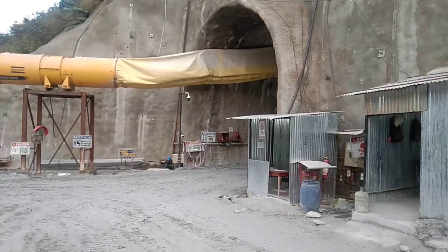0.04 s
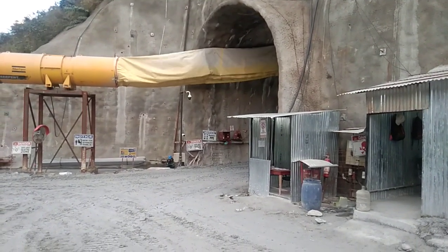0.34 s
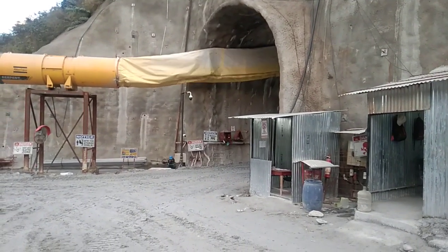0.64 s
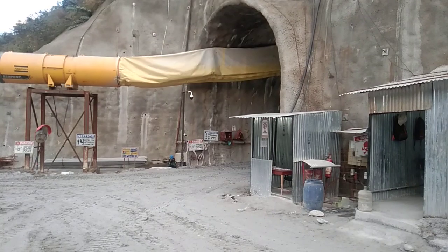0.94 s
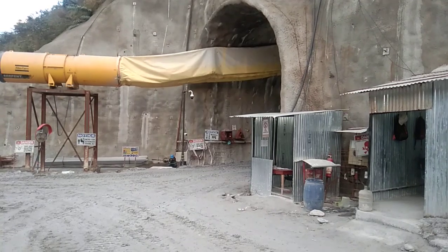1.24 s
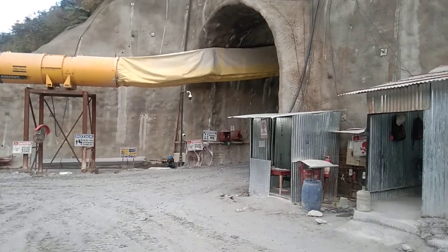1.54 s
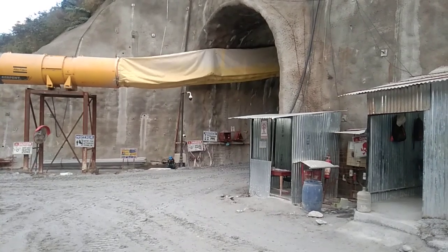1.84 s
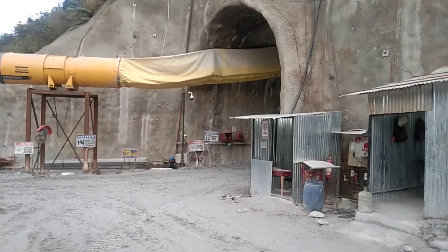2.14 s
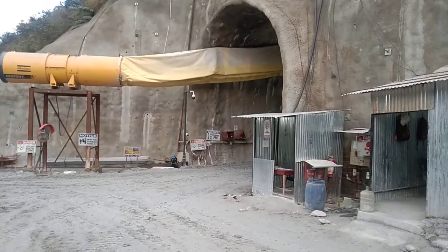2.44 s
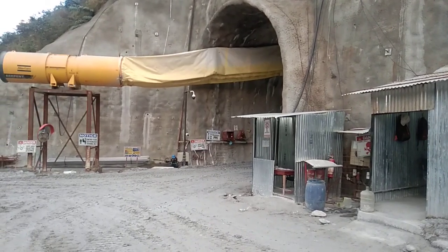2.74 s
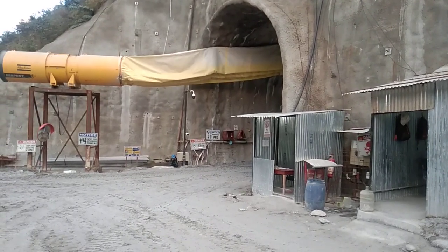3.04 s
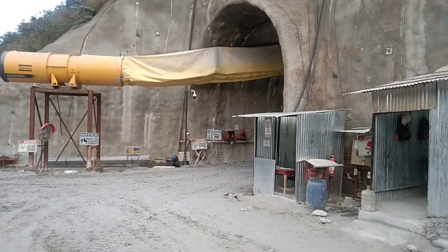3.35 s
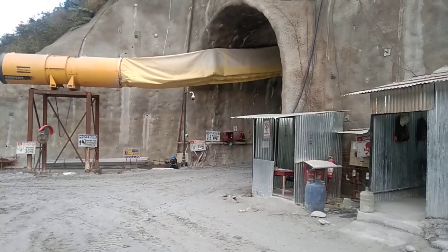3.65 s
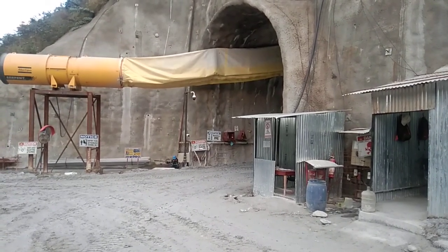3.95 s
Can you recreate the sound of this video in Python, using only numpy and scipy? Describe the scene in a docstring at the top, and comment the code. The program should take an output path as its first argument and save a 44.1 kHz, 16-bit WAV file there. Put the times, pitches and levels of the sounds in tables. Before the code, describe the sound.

Explosions inside a tunnel, heard from the yard outside, come in repeated clusters of deep booms, slaps and cracks. Hissing, roaring gusts trail each one and fade in reverberation, while ventilation rumbles and the tunnel hums throughout.

```python
"""Blasts deep in a tunnel reach the portal about once a second as pressure waves.
Each brings a low boom and a slap, often followed by a sharp crack, probably of the fabric air duct.
Gritty surges of turbulent air follow and die away in the tunnel's reverberation.
The tunnel's low resonance drones throughout, over a steady ventilation rumble."""
import sys
import numpy as np
from scipy import signal
from scipy.fft import rfft, irfft
from scipy.io import wavfile
from scipy.ndimage import uniform_filter1d

SR = 44100
rng = np.random.default_rng(int(sys.argv[2]) if len(sys.argv) > 2 else 0)


def store_wav(level_fs):
    """Save 16-bit WAV to argv[1]."""
    pcm = np.round(np.clip(np.atleast_2d(level_fs), -1, 1) * 32767)
    wavfile.write(sys.argv[1], SR, pcm.T.astype(np.int16))


N = 176400

# Low booms: t/s, hold/s, level/dB, spectral tilt/(dB per octave)
BOOM_EVENTS = [(0.288, .055, -22.5, -7), (0.562, 0.035, -18, -5), (1.494, 0.053, -16, 2),
               (1.552, .045, -15.5, 2.5), (1.874, 0.043, -16, -1.5), (2.006, 0.15, -22.5, 1),
               (2.314, 0.17, -25.5, 1), (2.701, .02, -12, 2), (2.752, 0.03, -14, 0),
               (3.014, 0.082, -17, 0.5), (3.148, 0.038, -17.5, 4), (3.23, 0.19, -24, 2),
               (3.864, 0.015, -18.5, -7.5)]
# Dull slaps and sharp cracks: t/s, hold/s, level/dB
SLAP_EVENTS = [(.606, 0.0044, -12), (.756, 0.0027, -34), (.851, 0.0023, -20), (1.557, .001, -17.5),
               (2.341, .001, -21), (2.687, .006, -14), (3.003, .002, -35)]
CRACK_EVENTS = [(.637, .003, -12.5), (.729, .005, -31), (.914, 0.0057, -24), (1.607, 0.00091, -12),
                (1.791, 0.0036, -25.5), (1.885, 0.0036, -32), (3.151, .003, -35)]
# Surges of air: t/s, rise/s, hold/s, fall/s, roar level/dB, hiss level/dB
SURGE_EVENTS = [(-.05, 0.032, 0.09, 0.15, -33.5, -40), (0.228, 0.028, 0.057, 0.03, -37, -40),
                (0.533, 0.024, 0.035, .03, -29.5, -38), (0.585, 0.014, 0.035, 0.094, -22, -29),
                (0.628, 0.01, 0.025, 0.074, -24.5, -18.5), (0.721, .008, 0.043, 0.073, -24, -27.5),
                (0.826, 0.024, 0.11, 0.083, -24.5, -28.5), (0.908, .015, 0.029, 0.032, -41, -23),
                (1.244, .05, .10, .07, -38.5, -54), (1.524, 0.039, 0.013, 0.11, -25, -31),
                (1.607, 0.0068, 0.017, 0.049, -26.5, -19), (1.716, 0.023, 0.11, 0.053, -23.5, -27.5),
                (1.792, .012, .025, 0.062, -36, -25), (1.865, 0.035, 0.026, 0.13, -25, -26),
                (1.97, .02, 0.051, 0.055, -32, -35), (2.334, 0.025, 0.058, 0.044, -29, -32.5),
                (2.668, 0.007, .03, 0.053, -31, -33), (2.725, 0.011, 0.017, 0.018, -30.5, -29),
                (2.8, .015, 0.076, 0.034, -36, -38.5), (2.927, 0.021, 0.072, 0.12, -27, -32),
                (3.14, 0.015, 0.12, 0.11, -31, -34.5), (3.29, 0.018, 0.028, 0.085, -37, -39.5),
                (3.586, 0.013, 0.062, 0.093, -34.5, -39.5), (3.793, .015, 0.031, 0.045, -35, -42)]
# Envelope of the tunnel resonance: t/s, level/dB
DRONE_ENVELOPE = [(0, -39), (.45, -32), (.75, -26.5), (1.2, -48), (1.6, -27), (1.95, -28), (2.4, -32),
                  (2.8, -26), (3.25, -22), (3.55, -28.5), (4, -28.5)]
# Spectra of a blast's three parts: f/Hz, relative level/dB
BOOM_SPECTRUM = [(20, -29), (40, -23), (65, -2), (100, 7.5), (135, -1.5), (175, -4), (230, -16.5),
                 (400, -33.5), (900, -70), (3000, -100)]
SLAP_SPECTRUM = [(80, 2), (300, -3), (480, -2), (700, 4), (1050, -5), (1370, 4.5), (1580, -8), (1800, 5.5),
                 (2250, -12.5), (2700, -4), (3200, -19), (3700, -13), (4200, -17.5), (5000, -9),
                 (6700, -12.5), (8500, -33), (12000, -51), (15500, -44)]
CRACK_SPECTRUM = [(200, -41), (1200, -46), (2100, 0), (2900, 1), (3400, -18), (4200, -23), (4600, 3.5),
                  (5050, 11), (5700, -2), (6600, -3), (7400, -6), (8400, -23), (10500, -28), (12500, -37),
                  (15500, -35)]
# Spectra of a surge's three bands and its dark reverberant roll: f/Hz, relative level/dB
ROAR_SPECTRUM = [(80, -25), (200, -1.5), (310, 1), (480, -5), (660, 1.5), (860, 1), (1150, -4.5),
                 (1500, -2.5), (1800, -2), (2200, -3.5), (2700, -6.5), (3300, -14), (4200, -23),
                 (8000, -43), (12000, -80)]
HISS_SPECTRUM = [(1000, -16), (2400, -9.5), (3400, -7.5), (3720, -2.5), (4080, -11.5), (4500, -3),
                 (4800, -7.5), (5300, -1.5), (6000, -1), (6500, -0.5), (6950, -3.5), (7350, -9.5),
                 (7650, -11.5), (8100, -17.5), (8700, -26.5), (10300, -36.5), (12300, -45), (15500, -45)]
FIZZ_SPECTRUM = [(5000, -31), (7500, 2), (9000, 0), (10500, -3), (12300, -13), (15500, -6.5)]
ROLL_SPECTRUM = [(100, -15), (200, -1), (300, 0.5), (470, 0), (680, -1.5), (900, 3), (1400, -8.5),
                 (2500, -17.5), (5000, -45), (10000, -82)]
# Spectra of the ventilation: f/Hz, relative level/dB
RUMBLE_SPECTRUM = [(15, -18), (32, -23), (45, -10), (62, 0.5), (85, -1.5), (110, -2.5), (145, -3),
                   (190, -12.5), (260, -21.5), (400, -27.5), (900, -49), (3000, -94)]
AIRFLOW_SPECTRUM = [(150, -4.5), (340, 2), (470, -3), (640, 3.5), (900, 1), (1150, -4.5), (1800, -4.5),
                    (2500, -10), (3200, -12.5), (4200, -14.5), (5600, -12), (6600, -11), (7600, -25),
                    (8700, -36), (12000, -55), (15500, -53)]

TUNNEL_T60_S, ROLL_T60_S, WALL_T60_S = 1.53, 3.8, 0.1
FIZZ_DB, ROLL_DB, WALL_DB = -28.5, -7, -14.5
GRIT_PER_S, GRIT_POWER_SHARE, GRIT_SPREAD_DB = 1500, 0.27, 4.5
DRONE_HZ, DRONE_WANDER_HZ, DRONE_WAVER_DB = 101.9, 2.4, 1.5
RUMBLE_DB, AIRFLOW_DB, AIRFLOW_FADE_DB_PER_S = -25.5, -35, 1.34


def booms(pivot_hz=100):
    """Pressure waves carry low-frequency energy; spectral tilt makes each deeper or tighter."""
    out = np.zeros(N)
    for start, hold, db, tilt_db in BOOM_EVENTS:
        spectrum = [(hz, level + tilt_db * np.log2(hz / pivot_hz)) for hz, level in BOOM_SPECTRUM]
        envelope = np.sqrt(burst_power(start, rise_s=0.0069, hold_s=hold, fall_s=0.03))
        out += amp(db) * envelope * low_noise(spectrum, evenness=1)
    return out


def slaps():
    """A steep wavefront is heard as a brief, broadband slap."""
    power = sum(amp(db) ** 2 * burst_power(start, rise_s=0.0015, hold_s=hold, fall_s=0.0082)
                for start, hold, db in SLAP_EVENTS)
    return reverberant_envelope(power, echo_db=-5.5) * colour(noise(), SLAP_SPECTRUM)


def cracks():
    """Short transients, probably of the fabric duct, concentrate their energy in the treble."""
    power = sum(amp(db) ** 2 * burst_power(start, rise_s=0.0054, hold_s=hold, fall_s=0.01)
                for start, hold, db in CRACK_EVENTS)
    return reverberant_envelope(power, echo_db=-16.5) * colour(noise(), CRACK_SPECTRUM)


def air_surges():
    """Turbulent flow radiates roar, hiss and fizz; the roar reverberates longest, the fizz not at all."""
    bursts = np.array([burst_power(*row[:4]) for row in SURGE_EVENTS])
    roar_power, hiss_power = amp(np.array(SURGE_EVENTS)[:, -2:].T) ** 2 @ bursts
    roar = reverberant_envelope(roar_power, echo_db=-1.5) * colour(turbulence(), ROAR_SPECTRUM)
    hiss = reverberant_envelope(hiss_power, echo_db=-7) * colour(turbulence(), HISS_SPECTRUM)
    fizz = amp(FIZZ_DB) * np.sqrt(hiss_power) * colour(turbulence(), FIZZ_SPECTRUM)
    roll = amp(ROLL_DB) * np.sqrt(diffuse_tail(roar_power, ROLL_T60_S)) * colour(noise(), ROLL_SPECTRUM)
    flutter_db = 0.5 * drift(rate_hz=60)
    return (roar + hiss + fizz) * amp(flutter_db) + roll


def turbulence():
    """Turbulent noise with grit: small crackles that arrive as a Poisson process."""
    impulses = (rng.random(N) < GRIT_PER_S / SR) * np.sign(noise())
    grit_db = GRIT_SPREAD_DB * np.minimum(rng.exponential(1, N), 2.8)
    grit = unit(impulses * amp(grit_db))
    return np.sqrt(1 - GRIT_POWER_SHARE) * noise() + np.sqrt(GRIT_POWER_SHARE) * grit


def wall_reflections(x, count=40):
    """Early reflections from the rock face and tin sheds add delayed, weaker copies."""
    delay_s = rng.uniform(0.002, 0.05, count)
    polarity = rng.choice([-1., 1.], count)
    taps = np.zeros(SR // 2)
    taps[(delay_s * SR).astype(int)] = polarity * amp(-60 * delay_s / WALL_T60_S)
    echo = signal.oaconvolve(x, taps / np.linalg.norm(taps))[:N]
    return (x + amp(WALL_DB) * echo) / np.sqrt(1 + amp(WALL_DB) ** 2)


def reverberant_envelope(power, echo_db):
    """Direct and reverberant sound add in power; the square root gives their amplitude."""
    return np.sqrt(power + amp(echo_db) ** 2 * diffuse_tail(power, TUNNEL_T60_S))


def diffuse_tail(power, t60_s):
    """The power of a diffuse field decays exponentially, by 60 dB in the reverberation time."""
    retained = np.exp(-2 * np.log(1e3) / (t60_s * SR))
    return signal.lfilter([1 - retained], [1, -retained], power)


def tunnel_drone():
    """A low resonance of the tunnel's air swells and ebbs, wavering in pitch and level."""
    level_db = np.interp(np.arange(N) / SR, *np.transpose(DRONE_ENVELOPE))
    level_db += DRONE_WAVER_DB * drift(rate_hz=7.6)
    cycles = np.cumsum(DRONE_HZ + DRONE_WANDER_HZ * drift(rate_hz=17.3)) / SR
    return amp(level_db) * unit(np.sin(2 * np.pi * cycles))


def ventilation():
    """Forced flow makes continuous noise: a steady rumble and a slowly easing rush in the duct."""
    rumble = amp(RUMBLE_DB) * low_noise(RUMBLE_SPECTRUM, evenness=0.67)
    airflow_db = AIRFLOW_DB - AIRFLOW_FADE_DB_PER_S * (np.arange(N) - N / 2) / SR
    return rumble + amp(airflow_db) * colour(noise(), AIRFLOW_SPECTRUM)


def burst_power(start_s, rise_s, hold_s, fall_s):
    """Power is amplitude squared; the amplitude rises linearly, holds and decays exponentially."""
    t = np.arange(N) / SR - start_s
    attack = np.clip(t / rise_s, 0, 1)
    decay = np.exp(-np.maximum(t - rise_s - hold_s, 0) / fall_s)
    return (attack * decay) ** 2


def low_noise(spectrum, evenness):
    """Narrowband noise swells at random; dividing by its envelope evens it out (0 none, 1 most)."""
    x = colour(noise(), spectrum)
    power = abs(uniform_filter1d(uniform_filter1d(x ** 2, size=900), size=900))
    return unit(x / (power + 1e-6) ** (evenness / 2))


def drift(rate_hz):
    """Low-pass noise gives a random fluctuation of rms 1."""
    f = np.fft.rfftfreq(N, 1 / SR)
    return unit(irfft(rfft(noise()) * (f > 0) * np.exp(-(f / rate_hz) ** 2), N))


def colour(x, spectrum):
    """Filtering imposes a spectrum, interpolated in log frequency; the result has rms 1."""
    hz, db = np.transpose(spectrum)
    f = np.fft.rfftfreq(N, 1 / SR)
    gain = amp(np.interp(np.log(f + 1), np.log(hz), db))
    return unit(irfft(rfft(x) * gain, N))


def noise():
    """Gaussian white noise."""
    return rng.standard_normal(N)


def amp(db):
    """Amplitude ratio of a level in decibels."""
    return 10 ** (np.asarray(db) / 20)


def unit(x):
    """Normalisation to rms 1."""
    return x / np.sqrt(np.mean(x ** 2) + 1e-20)


def scene():
    """The sources superpose in the yard before the portal."""
    blasts = slaps() + cracks() + wall_reflections(air_surges()) + booms()
    return (blasts + ventilation() + tunnel_drone())[None]


def record(dry, ceiling=0.85, cutoff_hz=15550):
    """Soft saturation rounds the highest peaks, and a low-pass filter limits the band."""
    rounded = dry / (1 + (dry / ceiling) ** 8) ** (1 / 8)
    taps = signal.firwin(511, cutoff_hz, window=("kaiser", 9), fs=SR)
    return signal.oaconvolve(rounded, taps[None], "same")


dry = scene()
out = record(dry)
store_wav(out)
```